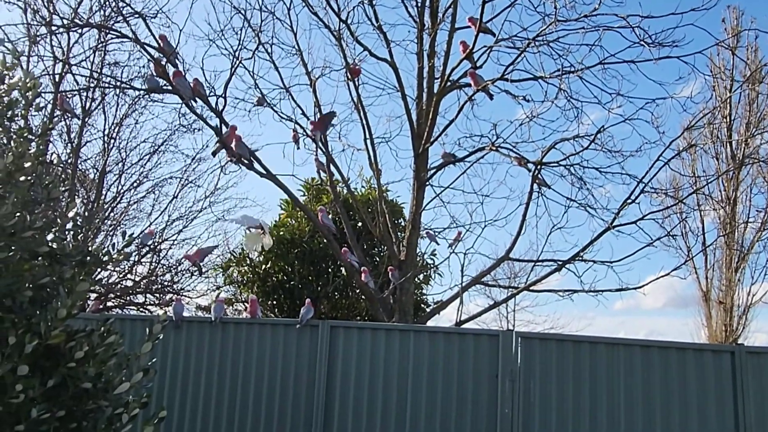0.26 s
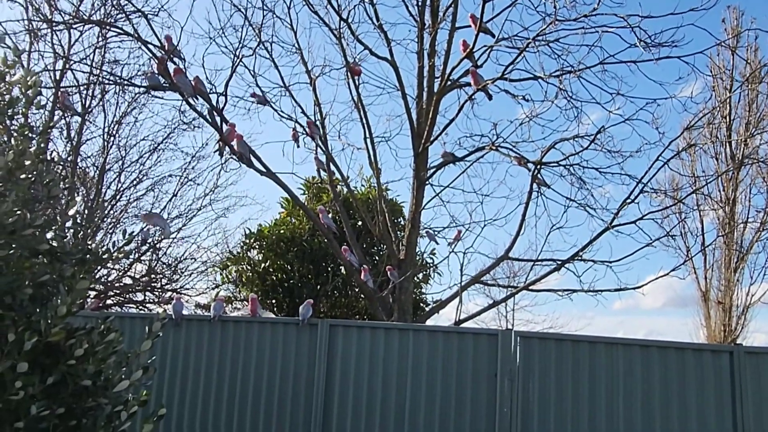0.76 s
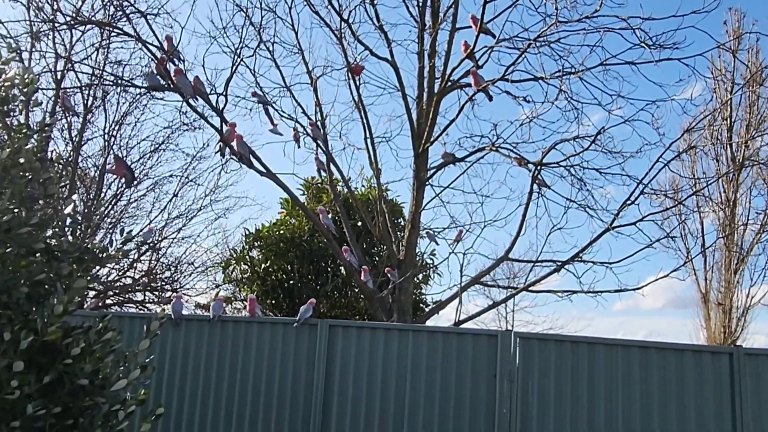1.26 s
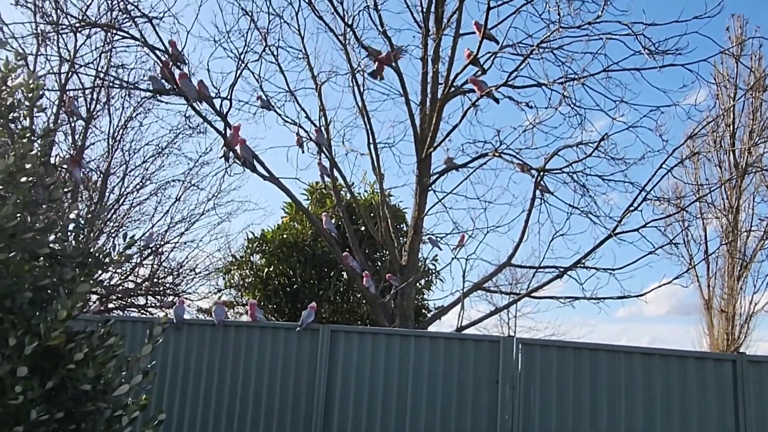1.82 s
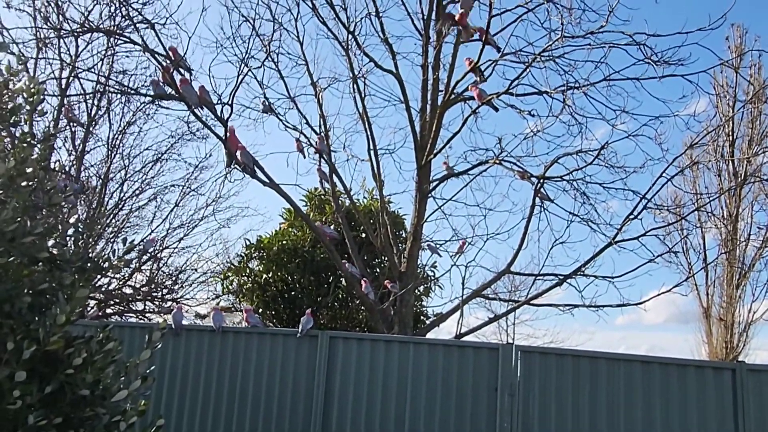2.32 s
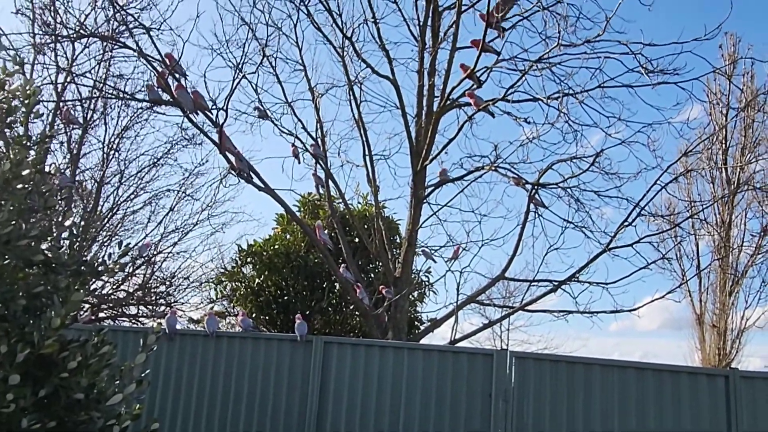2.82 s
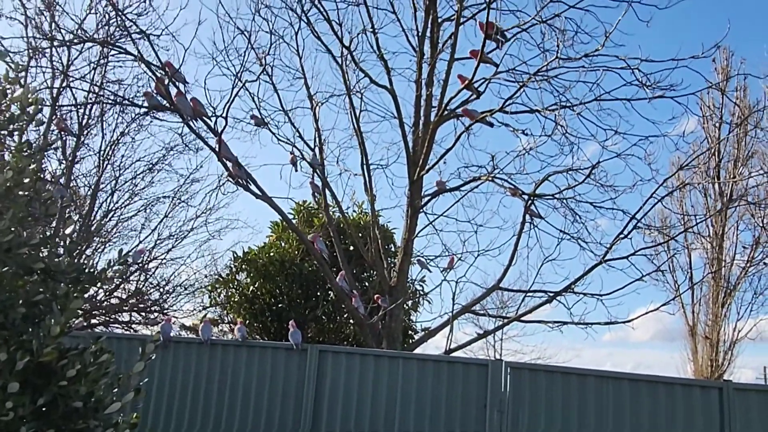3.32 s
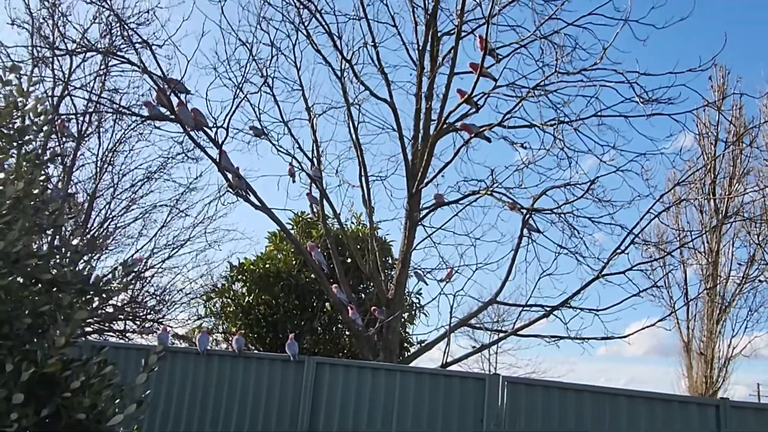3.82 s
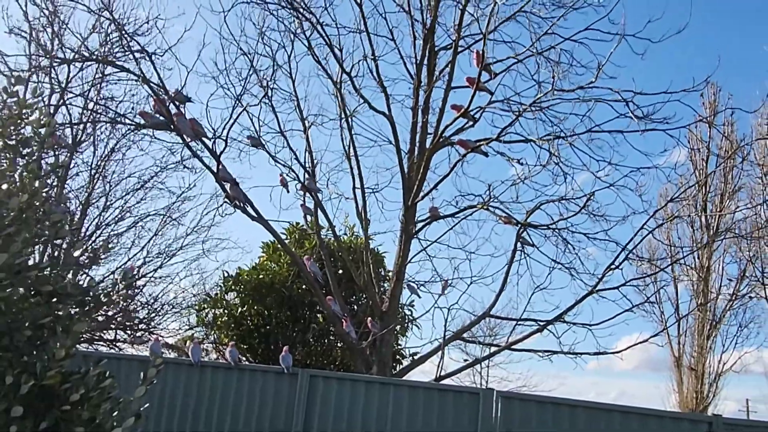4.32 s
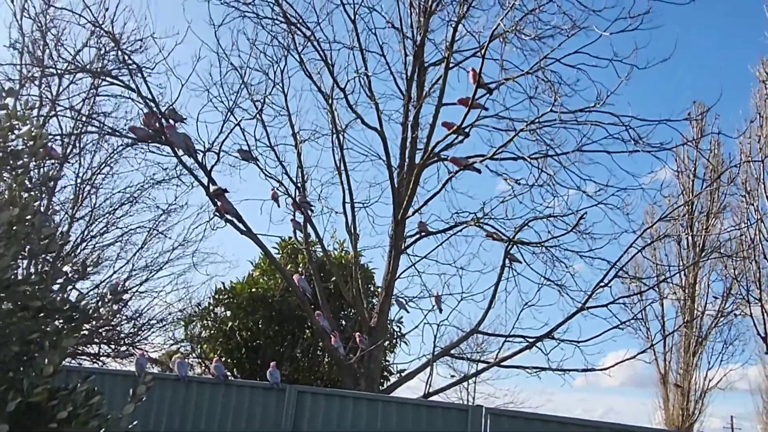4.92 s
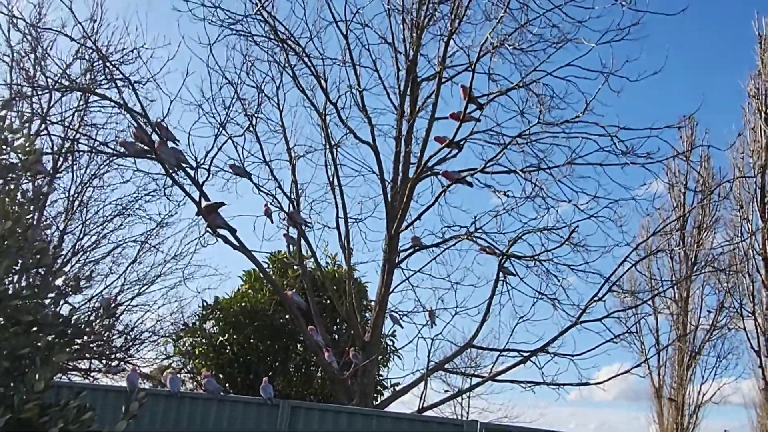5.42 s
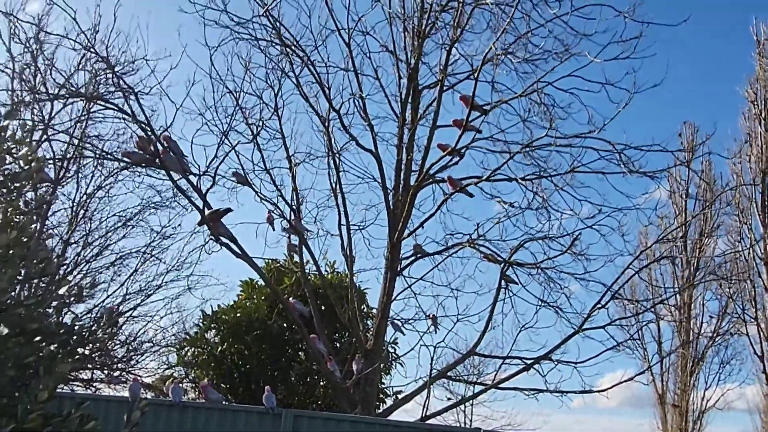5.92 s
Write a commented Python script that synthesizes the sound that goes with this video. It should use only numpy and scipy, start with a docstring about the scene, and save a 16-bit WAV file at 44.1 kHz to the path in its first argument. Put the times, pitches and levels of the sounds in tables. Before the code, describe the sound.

A flock of parrots calls in an open backyard, heard from a moderate distance in stereo with faint garden reflections. From 0 to 1 s there are mostly soft, bending whines, weak chirps, a light wing rustle and deep wind rumble, swelling near 0.8 s with a lumpy buffet of air. Between 1.2 and 2.2 s several short screeches sound, each a high squeal dropping into a lower, raspy note with a tiny creak. Air buffets swell from about 2.1 to 3 s, and sharp dry snaps crackle near 2.6 s. Chirps crowd together from 2.6 to 3.7 s, then the strongest rapid screeches come at 3.8 to 4.6 s, with wind thumps near 3.5 and 3.8 s. Clear whines follow until about 5 s. Afterward only scattered, softer chirps remain over faint distant birds and steady airy background, as the low rumble surges at the end, about 6 s.

```python
"""Galahs chatter in a garden: their screeches are chains of short notes that jump between tone and rasp.
Each note is a stack of gliding harmonics, roughened by jitter, beating and hiss; creaks are ringing pulses.
Some birds whine softly in bending, nearly pure notes, and faint chirps come from a flock farther off.
Filtered noise makes the rumble and thumps of wind, lumpy buffets of air (probably from the wings of a bird
flying over), dry snaps, soft rustles of beating wings and the steady background.
"""
import sys
import numpy as np
from scipy import signal
from scipy.fft import rfft, irfft
from scipy.io import wavfile
from scipy.ndimage import uniform_filter1d

SR = 44100
rng = np.random.default_rng(int(sys.argv[2]) if len(sys.argv) > 2 else 0)


def wav_record(signal):
    """Record a signal, one row per channel, as 16-bit PCM in the file named by sys.argv[1]."""
    frames = np.transpose(np.atleast_2d(signal))
    bounded = np.clip(frames, -1, 1)
    # unit amplitude maps onto the largest positive 16-bit level
    quanta = np.round(bounded * 32767).astype(np.int16)
    wavfile.write(sys.argv[1], SR, quanta)


N = 272084
TIME = np.arange(N) / SR
EDGE_S = 0.008   # a note's attack and release
# where birds are heard: (left minus right in dB, lag of the right ear in ms)
LOW_PLACE, HELD_PLACE, HIGH_PLACE = (1.5, 0.4), (2.7, 0.28), (-2, 0.28)


def from_db(db):
    """Decibels to gain."""
    return 10 ** (np.asarray(db) / 20)


def rms_one(x):
    """Scale to unit power."""
    return x / np.sqrt(np.mean(x ** 2) + 1e-20)


def at_hz(points, hz):
    """Read a spectrum on a log-frequency axis."""
    f, value = np.transpose(points)
    return np.interp(np.log(hz), np.log(f), value)


def wobble(size, rate_hz):
    """Smooth random motion of unit power: noise through two equal one-pole low-passes."""
    r = np.exp(-2 * np.pi * rate_hz / SR)
    slow = signal.lfilter([1], [1, -2 * r, r * r], rng.standard_normal(size + 4000))
    return rms_one(slow)[-size:]


def coloured(spectrum, alike):
    """Stereo noise with a given spectrum and left-right likeness; rms 1."""
    hz = np.maximum(np.fft.rfftfreq(N, 1 / SR), 1)
    low_skirt = np.minimum(1, hz / spectrum[0][0]) ** 2
    high_skirt = np.minimum(1, spectrum[-1][0] / hz) ** 2
    port = hz ** 2 / np.hypot(hz ** 2, 29 ** 2)   # the microphone loses the deepest bass
    shape = from_db(at_hz(spectrum, hz)) * low_skirt * high_skirt * port
    mid, side = irfft(rfft(rng.standard_normal((2, N))) * shape, N)
    alike = np.clip(alike, -1, 1)
    return rms_one(np.sqrt(1 + alike) * mid + np.sqrt(1 - alike) * side * [[1], [-1]])


def resonance(x, hz, width_hz):
    """Two-pole resonance with gain near 1 at its peak."""
    r = np.exp(-np.pi * width_hz / SR)
    feedback = [1, -2 * r * np.cos(2 * np.pi * hz / SR), r * r]
    return signal.lfilter(np.array([1, 0, -1]) * (1 - r * r) / 2, feedback, x)


def ring(x, modes):
    """Sum of parallel resonances, each passed twice for steeper sides; rms 1."""
    return rms_one(sum(from_db(db) * resonance(resonance(x, hz, width), hz, width)
                       for hz, width, db in modes))


def fade(t, length, edge):
    """A gate from 0 to length with soft edges centred on both ends."""
    return np.sin(np.pi / 2 * np.clip(np.minimum(t, length - t) / edge + 0.5, 0, 1)) ** 2


def add(out, sound, start, pan_db, lag_ms):
    """Place a bird's sound by level and arrival time: pan_db is left minus right, lag_ms delays the right."""
    at = np.arange(len(sound))
    for ear, (sign, delay) in enumerate([(1, 0), (-1, lag_ms * SR / 1000)]):
        where = at + int(round(start * SR)) + int(round(delay))
        inside = (where >= 0) & (where < N)
        out[ear, where[inside]] += sound[inside] * np.sqrt(2 / (1 + from_db(-sign * pan_db) ** 2))


def perch(place, pan_spread_db=2.5, lag_spread_ms=0.09):
    """Each note sits randomly a little to one side of its place."""
    return np.array(place) + rng.standard_normal(2) * [pan_spread_db, lag_spread_ms]


# Screeches: a squeal breaks into a held low note and ends in a creak.
# Each row: time of the break in seconds, squeal length in seconds, squeal mean pitch in Hz, squeal level in
# dB before trim, held length in seconds, held pitch in Hz, held level in dB before trim, brightness in dB,
# rasp of the held note 0-1, creak level in dB before trim.
SCREECH_NOTES = [(1.386, .038, 3810, -25.5, 0.021, 2950, -31, 0, 0.02, -45.5),
                 (1.723, 0.058, 4177, -27.5, 0.052, 3087, -38, -4, 0.58, -67),
                 (1.912, 0.014, 3990, -33.5, 0.073, 2874, -31, 5, 0.25, -40.5),
                 (2.146, 0.02, 3920, -35.5, 0.071, 2800, -35, 6, 0.28, -51),
                 (3.809, 0.031, 3790, -25, 0.054, 2790, -27.5, -0.5, 0.72, -47.5),
                 (4.004, .034, 3823, -20.5, 0.035, 2780, -30, 5.5, 0.36, -44.5),
                 (4.182, 0.029, 4100, -24, .040, 2940, -28.5, -5, 0.14, -43.5),
                 (4.366, 0.02, 3640, -34.5, .038, 2940, -27.5, -7, .15, -47.5),
                 (4.552, 0.028, 3740, -33, 0.045, 2840, -29, -1, 0.21, -46.5)]


def screeches(squeal_fall=0.1675, squeal_rasp=0.32, held_fall=0.0406):
    """A high squeal breaks at once into a held lower note; falls are shares of the pitch."""
    out = np.zeros((2, N))
    for row in SCREECH_NOTES:
        break_s, squeal_s, squeal_hz, squeal_db, held_s, held_hz, held_db, bright_db, rasp, _ = row
        squeal = high_note(squeal_s, squeal_hz, squeal_fall, squeal_db, squeal_rasp)
        held = low_note(held_s, held_hz, held_fall, held_db, bright_db, rasp)
        add(out, squeal, break_s - squeal_s - EDGE_S, *perch(HIGH_PLACE))
        add(out, held, break_s - EDGE_S, *perch(HELD_PLACE))
    return out


# Chirps in the low voice. Each row: start in seconds, length in seconds, pitch in Hz, closing fall as a
# share of the pitch, level in dB before trim, brightness in dB, rasp 0-1.
LOW_CHIRPS = [(0.524, 0.036, 2432, -0.014, -47, 8, 0.3), (0.555, 0.028, 2350, 0.13, -45, -6, 0.25),
              (1.002, 0.081, 2790, 0.036, -51.5, -2.5, 0.44), (1.209, 0.062, 2010, 0.069, -49, -3, 0.4),
              (1.305, 0.022, 2950, -0.023, -37.5, -1, 0.45), (1.443, 0.13, 2470, -0.078, -55, -9, 0.23),
              (1.611, .028, 3150, -0.036, -49, 1, .4), (1.979, 0.0151, 2740, 0.049, -36, 5, 1),
              (1.988, 0.025, 3254, 0.013, -30, -8, 0.28), (2.421, 0.05, 2517, 0.073, -49.5, 7.5, 0.37),
              (2.469, 0.08, 2645, 0.14, -49.5, 3, 0.58), (2.622, 0.076, 2504, 0.18, -32, -7.5, 0.38),
              (2.765, .07, 2663, 0.21, -30, -3, 0.19), (2.911, 0.053, 2630, .14, -30, -3.5, 0.36),
              (3.037, .042, 2355, 0.13, -36.5, -4.5, 0.15), (3.099, 0.064, 2576, 0.099, -33.5, -3.5, 0.6),
              (3.147, 0.071, 2577, -0.017, -32.5, -0.5, 0.69),
              (3.179, 0.038, 2830, 0.011, -41.5, 5.5, 0.24), (3.261, 0.025, 2324, 0.014, -35, -3, 0.3),
              (3.298, 0.057, 2550, 0.038, -34.5, 2, 0.24), (3.299, 0.059, 2180, 0.08, -38.5, -4.5, 0.3),
              (3.348, 0.049, 2530, .03, -34, -2, 0.43), (3.417, 0.07, 2524, 0.19, -46.5, 6, 0.25),
              (3.463, 0.045, 2796, 0.13, -33, 1, 0.22), (3.5, 0.072, 2314, 0.098, -39, -8, 0.25),
              (3.581, 0.063, 2290, 0.025, -36.5, -5.5, 0.31), (3.6, 0.057, 2665, 0.093, -35, -2.5, 0.08),
              (3.755, 0.06, 2578, 0.059, -37, 5.5, 0.48), (3.929, 0.028, 2704, 0.1, -31.5, 0.5, 0.7),
              (3.977, 0.032, 3090, 0.0994, -24.5, -8.5, 0.69), (4.096, 0.081, 2506, 0.068, -39.5, 6, 0.38),
              (4.223, 0.058, 2520, 0, -41.5, 5, 0.33), (4.245, 0.078, 2668, 0.053, -43.5, 6.5, .25),
              (4.324, 0.068, 2647, 0.19, -35.5, 3, 0.42), (4.484, 0.052, 2420, 0.049, -46, 7, 0.7),
              (4.627, 0.034, 2470, 0.047, -39, 6.5, 0.08), (5.422, 0.1, 2398, 0.12, -44.5, -0.5, 0.23),
              (5.562, .047, 2290, 0.037, -37.5, -1.5, 0.1), (5.612, 0.072, 2350, 0.042, -45, -4, 0.27),
              (5.773, 0.035, 2290, 0.076, -34.5, -14, 0.14), (5.808, 0.053, 2195, 0.2, -53.5, 6, 0.26),
              (6.114, .024, 2236, 0.061, -37, -4, 0.62), (6.142, 0.064, 2113, -0.023, -38.5, -7, 0.6)]
# Squeaks in the high voice. Each row: start in seconds, length in seconds, mean pitch in Hz, fall as
# a share of the pitch, level in dB before trim, rasp 0-1.
HIGH_SQUEAKS = [(0, 0.11, 3920, 0.096, -43, 0.73), (1.173, 0.026, 4040, 0.047, -38, 0.14),
                (1.222, 0.093, 4100, -0.14, -47, 0.36), (1.318, 0.013, 4660, -0.071, -38, 0.7),
                (1.337, 0.016, 4600, 0.15, -27.5, 0.52), (1.629, .023, 4870, 0.055, -35, .9),
                (1.655, 0.024, 3500, -0.062, -35.5, 0.7), (1.922, 0.026, 4200, 0.33, -30.5, 0.43),
                (2.17, 0.02, 3800, 0.26, -39, 0.8), (2.974, .064, 3420, 0.29, -38.5, 0.76),
                (3.132, 0.0685, 3740, -0.039, -27, 0.93), (3.202, 0.0174, 3820, 0.107, -46, .2),
                (3.769, 0.013, 3370, -0.14, -28.5, 0.95), (3.813, 0.014, 3714, 0.035, -25, 0.75),
                (3.951, 0.029, 4280, -0.17, -24.5, 0.61), (4.131, 0.0082, 4650, -0.12, -29.5, 0.3),
                (4.473, 0.037, 3550, 0.22, -46, .3), (5.768, 0.028, 3630, 0.012, -50.5, 0.3),
                (5.966, 0.016, 3700, 0.09, -43.5, 0.1), (6.04, 0.022, 3480, 0.28, -46, 0.34),
                (6.103, 0.025, 3760, 0.028, -40, 0.3)]


def chatter():
    """Further chirps and squeaks, some alone, some as broken pieces of a screech."""
    out = np.zeros((2, N))
    for start, *note in LOW_CHIRPS:
        add(out, low_note(*note), start - EDGE_S, *perch(LOW_PLACE))
    for start, *note in HIGH_SQUEAKS:
        add(out, high_note(*note), start - EDGE_S, *perch(HIGH_PLACE))
    return out


# The low voice's harmonics. Entries: levels in dB of harmonics 1, 2, 3 and of all higher ones.
LOW_HARMONICS = [0.5, 1, -9, -20.5]


def low_note(length, hz, fall, db, bright_db, rasp, lateness=3.03, crest_db=3.0, scoop=0.712, scoop_s=0.0097):
    """The low voice, rich in harmonics: it scoops into pitch, is loudest mid-note and bends late."""
    t = np.arange(-EDGE_S, length + EDGE_S, 1 / SR)
    held = np.clip(t, 0, length)
    # the scoop is a share of the closing fall, so a negative fall turns both around
    bend = scoop * np.exp(-held / scoop_s) + (held / length) ** lateness
    effort = rms_one(from_db(crest_db * np.sin(np.pi * held / length)))
    brighten = bright_db * (np.arange(len(LOW_HARMONICS)) > 0)   # lifts all but the fundamental
    return effort * syrinx(t, length, hz * (1 - fall * bend), db + np.array(LOW_HARMONICS) + brighten, rasp)


# The high voice's harmonics. Entries: levels in dB of harmonics 1, 2, 3 and of all higher ones.
HIGH_HARMONICS = [2, -14, -32.5, -34]


def high_note(length, hz, fall, db, rasp, lateness=1.48):
    """The high voice, mostly fundamental: it slides through its mean pitch, down if the fall is positive."""
    t = np.arange(-EDGE_S, length + EDGE_S, 1 / SR)
    slide = np.clip(t / length, 0, 1) ** lateness
    return syrinx(t, length, hz * (1 - fall * (slide - slide.mean())), db + np.array(HIGH_HARMONICS), rasp)


# Colour of harmonics 4 to 6. Each row: frequency in Hz, level in dB.
UPPER_COLOUR = [(8500, 3.5), (10300, -6.5), (11500, 1), (13000, -8), (14300, 2), (16000, -19)]
# Throat resonances that colour the hiss. Each row: frequency in Hz, width of each pass in Hz, level in dB.
THROAT_MODES = [(1320, 690, 0), (2510, 1200, 2), (3590, 170, 4.5), (5220, 370, 11), (7550, 380, 15.5),
                (14100, 3500, -11)]


def syrinx(t, length, glide, harmonics_db, rasp, jitter=0.026, jitter_hz=420, lurch=0.038, lurch_hz=70,
           flutter_db=2.5, flutter_hz=170, swell_db=3.5, swell_hz=46, plunge=0.11, plunge_s=0.0034,
           beat=1.23, beat_hz=700, beat_wander=0.117, beat_wander_hz=57.5, hiss_db=-6, grit_power=1.7):
    """The syrinx glides through one note; rasp shakes its pitch and strength and adds noise in the throat."""
    size, rasp = len(t), np.clip(rasp, 0, 1)
    grit = rasp ** grit_power   # beating and hiss set in only when the voice is pushed hard
    # the membranes slacken as a note stops, so its pitch plunges
    glide = glide * (1 - plunge / (1 + np.exp(np.clip((length - t) / plunge_s, -20, 20))))
    # fast jitter roughens the tone, slower lurches make its sweep jagged
    unsteady = jitter * wobble(size, jitter_hz) + lurch * wobble(size, lurch_hz)
    phase = 2 * np.pi * np.cumsum(glide * (1 + rasp * unsteady)) / SR
    *lower_db, top_db = harmonics_db
    levels = lower_db + [top_db + at_hz(UPPER_COLOUR, k * glide) for k in range(4, 7)]
    tone = 0
    for k, db in enumerate(levels, 1):
        # each harmonic swells and fades at random, on its own
        swell = rms_one(from_db(swell_db * wobble(size, swell_hz)))
        below_limit = k * glide < SR / 2
        tone = tone + np.sqrt(2) * from_db(db) * swell * np.sin(k * phase) * below_limit
    hiss = ring(rng.standard_normal(size), THROAT_MODES)
    # in a rasp the two membranes beat against each other, which splits each harmonic into strands
    beat_rate = beat_hz * (1 + beat_wander * wobble(size, beat_wander_hz))
    beating = np.sin(2 * np.pi * np.cumsum(beat_rate) / SR)
    tone = tone * rms_one(1 + beat * grit * beating)
    voice = tone + hiss * np.std(tone) * grit * from_db(hiss_db)
    # air pressure flutters in a rasp
    flutter = rms_one(from_db(flutter_db * np.sqrt(rasp) * wobble(size, flutter_hz)))
    return voice * flutter * fade(t, length, EDGE_S)


# The creak's resonances. Each row: frequency in Hz, width of each pass in Hz, level in dB.
CREAK_RESONANCES = [(680, 360, -5.5), (1230, 360, 0), (1910, 770, -3)]


def creaks(trim_db=3.0, length=0.028, pulses_per_s=550, uneven_db=2.39, uneven_hz=252, early_s=0.00295,
           pan_db=3.0, lag_ms=0.088):
    """As a screech gives out, the syrinx flaps in slow, uneven pulses that ring low in the throat."""
    out, t = np.zeros((2, N)), TIME[:int(2 * length * SR)]
    for break_s, _, _, _, held_s, *_, db in SCREECH_NOTES:
        start = break_s + held_s - early_s
        cycles = np.cumsum(pulses_per_s * from_db(uneven_db * wobble(len(t), uneven_hz))) / SR
        pulses = np.diff(np.floor(cycles), prepend=0)   # one click per completed cycle
        gate = fade(t - length / 4, length, length / 2)
        creak = from_db(db + trim_db) * ring(pulses, CREAK_RESONANCES) * gate
        add(out, creak, start - length / 4, pan_db, lag_ms)
    return out


# Soft whines, each one arc. Each row: start in seconds, length in seconds, pitch in Hz at the start,
# middle and end, level in dB before trim.
WHINE_ARCS = [(0, 0.48, 2060, 1992, 1696, -50.5), (.12, 0.053, 1300, 1515, 1730, -44.5),
              (.31, 0.11, 1327, 1720, 1355, -45), (.68, 0.14, 1645, 1825, 1320, -49.5),
              (.82, 0.081, 1373, 1790, 1500, -50.5), (.98, .48, 2198, 2262, 2164, -42),
              (1.47, 0.22, 1950, 1806, 1733, -42), (2.015, 0.045, 1210, 1110, 1070, -42),
              (2.04, 0.14, 1730, 1880, 2130, -50), (3.02, 0.097, 2170, 1903, 1410, -41),
              (3.125, 0.1, 1400, 1770, 1320, -44), (3.23, 0.21, 1540, 1780, 1540, -45.5),
              (3.64, 0.092, 1915, 1795, 1200, -44), (3.75, 0.16, 1256, 1662, 1268, -44.5),
              (4.18, 0.04, 1973, 1905, 1430, -34.5), (4.235, 0.087, 1398, 1300, 1596, -32.5),
              (4.335, 0.11, 1655, 1352, 1644, -37), (4.782, 0.067, 1826, 1933, 1468, -33.5),
              (4.85, 0.035, 2096, 2065, 2010, -37), (4.85, 0.13, 1740, 1693, 1370, -37),
              (4.99, .23, 1590, 1590, 1437, -49), (5.26, 0.19, 2080, 1900, 1930, -49.5)]


def whines(trim_db=-1.5, second_db=-19, half_db=-22, jitter=0.0072, jitter_hz=196,
           waver_db=3.5, waver_hz=39, edge_share=0.075, lag_ms=0.41):
    """Soft, nearly pure notes that bend slowly in pitch along a parabola."""
    out = np.zeros((2, N))
    for start, length, *pitches, db in WHINE_ARCS:
        t = np.arange(0, length, 1 / SR)
        arc = np.polyval(np.polyfit([0, length / 2, length], pitches, 2), t)
        phase = 2 * np.pi * np.cumsum(arc * (1 + jitter * wobble(len(t), jitter_hz))) / SR
        strength = from_db(db + trim_db) * rms_one(from_db(waver_db * wobble(len(t), waver_hz)))
        gate = np.clip(np.minimum(t, length - t) / (edge_share * length), 0, 1)
        # strong and weak cycles alternate, which adds a faint line an octave below
        tone = np.sin(phase) + from_db(second_db) * np.sin(2 * phase) + from_db(half_db) * np.sin(phase / 2)
        add(out, np.sqrt(2) * strength * gate * tone, start, 0, lag_ms)
    return out


def far_flock(per_s=14, quietest_db=-62, range_db=4, low_hz=1500, high_hz=4200, arch=0.077, second_db=-10,
              max_lag_ms=0.54):
    """Birds farther off call at random: faint two-harmonic chirps that arch and fall."""
    out = np.zeros((2, N))
    for when, pitch, duration, loudness, place in rng.random((int(per_s * N / SR), 5)):
        length = 0.039 + 0.055 * duration
        t = TIME[:int(length * SR)]
        crest_hz = low_hz * (high_hz / low_hz) ** pitch
        glide = crest_hz * (1 - arch * (3 * t / length - 1) ** 2 / 2)   # crest a third of the way in
        phase = 2 * np.pi * np.cumsum(glide) / SR
        call = (np.sin(phase) + from_db(second_db) * np.sin(2 * phase)) * np.sin(np.pi * t / length)
        add(out, from_db(quietest_db + range_db * loudness) * call, when * N / SR, 0, max_lag_ms * place)
    return out


# Reflections off ground, fence and house. Each row: left delay in seconds, right delay in seconds,
# level in dB.
REFLECTIONS = [(0.0046, 0.0051, -15), (0.021, 0.0195, -19), (0.033, 0.035, -19), (0.049, 0.047, -19)]


def garden(x, tail_db=-7.5, t60=0.44, treble_t60=0.18, split_hz=6500, build_up=0.0011):
    """A few distinct reflections, then a thin tail scattered by trees and walls; its treble dies first."""
    t = TIME[:SR]
    white = rng.standard_normal((2, SR))
    low = signal.sosfilt(signal.butter(2, split_hz, fs=SR, output="sos"), white)
    high = signal.sosfilt(signal.butter(2, split_hz, "high", fs=SR, output="sos"), white)
    # the minus sign keeps the two bands from cancelling at the split
    decaying = low * from_db(-60 * t / t60) - high * from_db(-60 * t / treble_t60)
    tail = decaying * (1 - np.exp(-t / build_up))
    response = from_db(tail_db) * tail / np.sqrt(np.sum(tail ** 2) / 2)
    for left, right, db in REFLECTIONS:
        response[[0, 1], [int(left * SR), int(right * SR)]] += from_db(db)
    return signal.fftconvolve(x, response, axes=1)[:, :N]


# Dry snaps. Each row: start in seconds, onset level in dB.
DRY_SNAPS = [(0.517, -46), (0.761, -52), (0.849, -52), (2.336, -50), (2.582, -26), (2.602, -32),
             (2.607, -37), (2.617, -27), (3.575, -43), (5.299, -52), (5.705, -52)]
# Soft rustles of beating wings. Each row: start in seconds, length in seconds, level in dB before flicker.
WING_RUSTLES = [(0.118, 0.064, -52), (0.18, 0.71, -59), (1.171, 0.081, -50), (2.003, 0.07, -55),
                (5.128, 0.217, -61.5), (5.666, 0.076, -76)]
# Colour of snaps and rustles. Each row: frequency in Hz, relative level in dB per Hz.
SNAP_RUSTLE_COLOUR = [(1500, -21), (3500, -4.5), (6500, -3), (9000, -0.5), (12000, -12), (16000, -4)]


def snaps_and_rustles(snap_t60=0.018, flicker_db=1.5, flicker_hz=41):
    """Dry, bright noise snaps that die within milliseconds, and soft, flickering rustles of beating wings."""
    snaps = sum(from_db(db - 60 * np.clip(TIME - start, 0, 1) / snap_t60) * (TIME >= start)
                for start, db in DRY_SNAPS)
    rustles = sum(from_db(db) * fade(TIME - start, length, 0.015) for start, length, db in WING_RUSTLES)
    flicker = from_db(flicker_db * wobble(N, flicker_hz))
    return (snaps + rustles * flicker) * coloured(SNAP_RUSTLE_COLOUR, alike=0.087)


# A higher-pitched, lumpy buffet of air. Each row: time in seconds, level in dB before trim.
BUFFET_CURVE = [(0, -49.5), (.76, -50.5), (.84, -37.5), (.95, -48.5), (1.6, -56), (2.11, -51), (2.159, -34),
                (2.33, -38), (2.898, -39), (3.02, -34), (3.062, -51), (3.4, -55), (4.2, -45), (5.1, -50),
                (5.4, -45.5), (6.17, -45)]
# Colour of the buffet. Each row: frequency in Hz, relative level in dB per Hz.
BUFFET_COLOUR = [(70, -42), (130, 9.5), (230, 2), (380, -5), (600, -12.5), (900, -22), (1600, -31.5)]


def air_buffets(trim_db=2.5, lumpy_db=3.0, lumpy_hz=34):
    """Lumpy buffets of air, probably from the wings of a bird flying over: low noise that swells at random."""
    lumps = rms_one(from_db(lumpy_db * wobble(N, lumpy_hz)))
    level_db = np.interp(TIME, *np.transpose(BUFFET_CURVE)) + trim_db
    return coloured(BUFFET_COLOUR, alike=0.91) * lumps * from_db(level_db)


# Slow rumble of the wind. Each row: time in seconds, level in dB before thumps and eddies.
RUMBLE_CURVE = [(0, -34), (.62, -34), (.78, -28.5), (1.0, -32), (1.8, -29.5), (2.05, -33.5), (3.02, -29),
                (3.3, -48), (3.74, -47), (3.9, -38.5), (4.25, -37), (4.7, -41.5), (5.05, -36.5),
                (5.23, -50), (5.32, -40), (5.75, -34.5), (5.98, -41), (6.17, -28.5)]
# Colour of the rumble. Each row: frequency in Hz, relative level in dB per Hz.
RUMBLE_COLOUR = [(12, -57), (20, 5), (43, -1), (63, 3.5), (105, -3.5), (214, -30), (400, -38.5), (520, -91),
                 (880, -120)]
# Single thumps on top of the rumble. Each row: centre in seconds, length in seconds, rise in dB.
WIND_THUMPS = [(0.23, 0.023, -1), (0.319, 0.025, 11), (0.75, 0.083, 4), (1.223, 0.12, 6),
               (1.652, 0.053, 3.5), (1.94, 0.033, 3), (3.473, 0.085, 12), (3.811, 0.038, 16),
               (5.054, 0.029, 7.5)]


def wind(eddy_db=2.5, eddy_hz=14):
    """Slow eddies of wind rumble on the microphone and now and then thump."""
    rumble = coloured(RUMBLE_COLOUR, alike=0.88)
    # level out the noise's own swells, so that the curve sets the loudness
    rumble = rumble / np.sqrt(uniform_filter1d(np.mean(rumble ** 2, axis=0), size=3500))
    level_db = np.interp(TIME, *np.transpose(RUMBLE_CURVE))
    thumps_db = sum(db * np.exp(-(2 * (TIME - centre) / length) ** 2) for centre, length, db in WIND_THUMPS)
    return rumble * from_db(level_db + thumps_db + eddy_db * wobble(N, eddy_hz))


# Colour of the steady background. Each row: frequency in Hz, relative level in dB per Hz.
AIR_COLOUR = [(240, -35), (400, 6.5), (419, -28), (460, 2.5), (826, 0.5), (1030, -5.5), (1400, 0.5),
              (1960, -1.5), (2750, -9.5), (3640, -12), (4950, -12), (7400, -18), (16000, -44.5)]


def background(level_db=-50.5):
    """The garden's steady background: wide, coloured noise at a constant level."""
    return from_db(level_db) * coloured(AIR_COLOUR, alike=0.13)


def scene(voices_trim_db=-0.5):
    """Birds with their garden reflections, then snaps, rustles, buffets, wind and background."""
    voices = from_db(voices_trim_db) * (screeches() + chatter())
    birds = voices + creaks() + whines() + far_flock()
    return birds + garden(birds) + snaps_and_rustles() + air_buffets() + wind() + background()


def record(dry, cutoff_hz=15900):
    """The top is cut steeply by an elliptic low-pass."""
    return signal.sosfilt(signal.ellip(10, 0.2, 80, cutoff_hz, fs=SR, output="sos"), dry)


dry = scene()
out = record(dry)
wav_record(out)
```